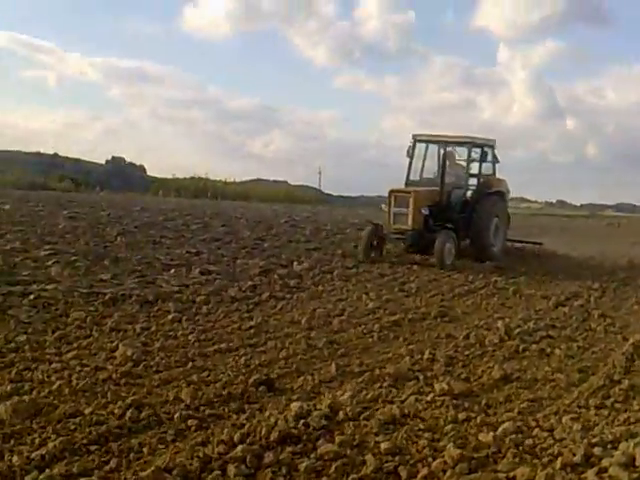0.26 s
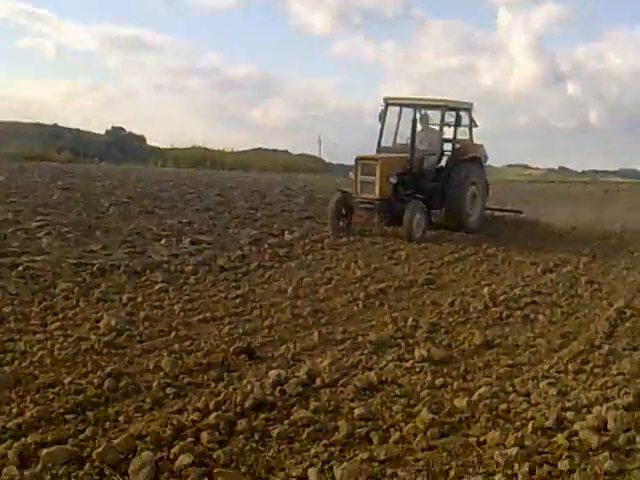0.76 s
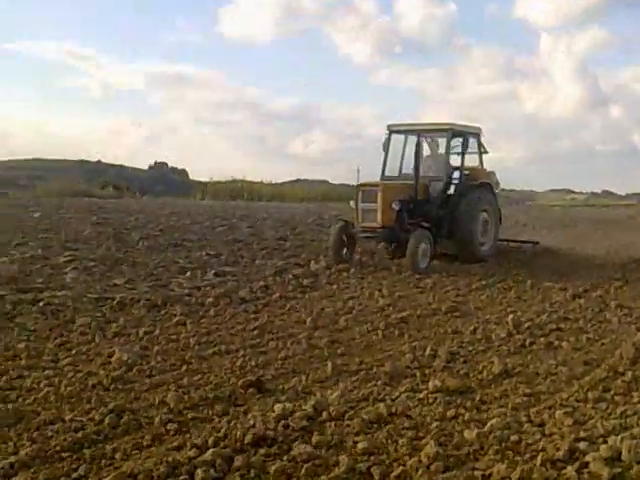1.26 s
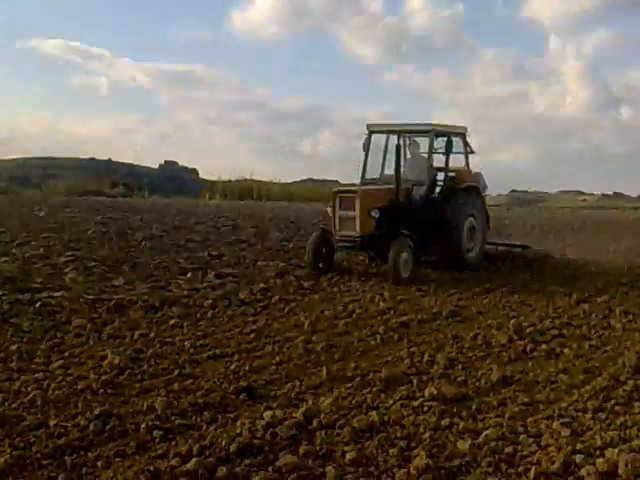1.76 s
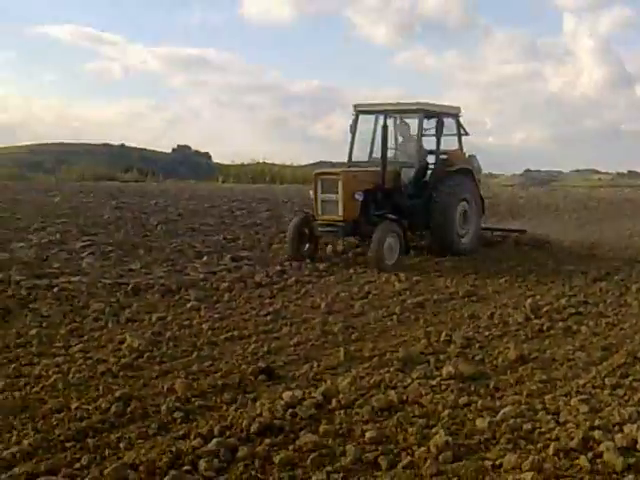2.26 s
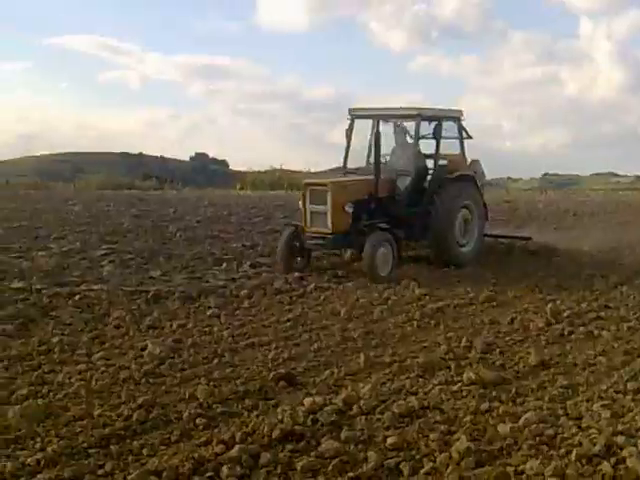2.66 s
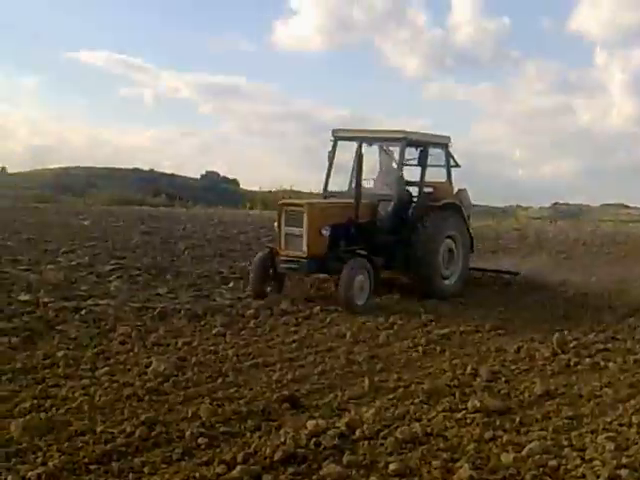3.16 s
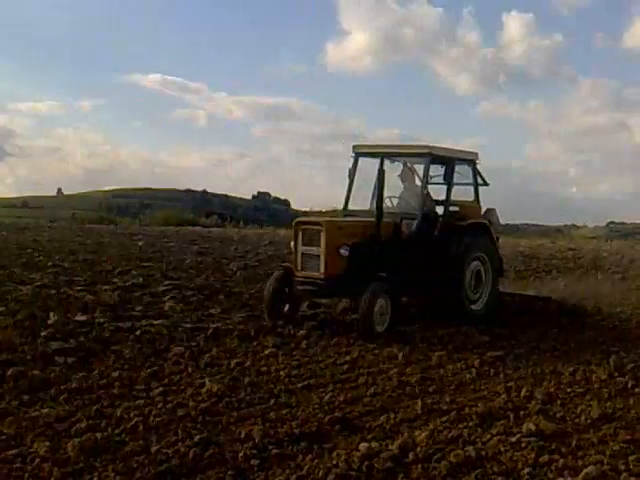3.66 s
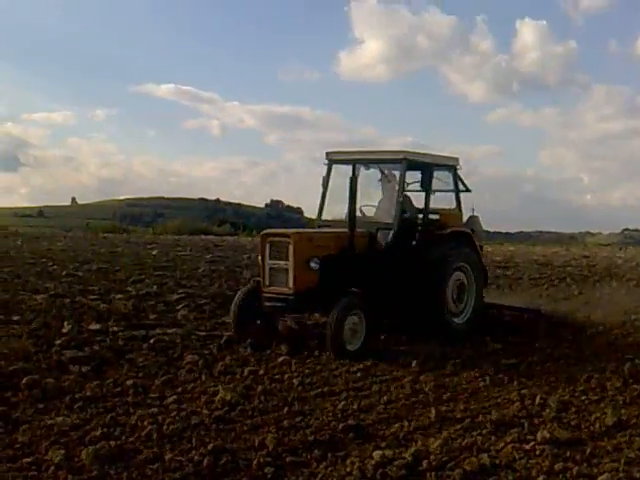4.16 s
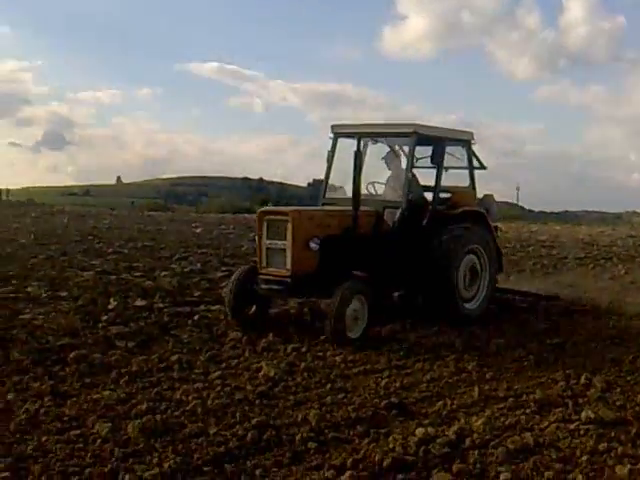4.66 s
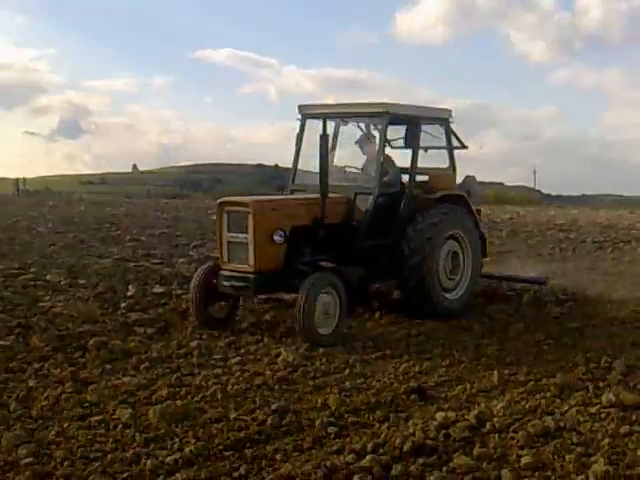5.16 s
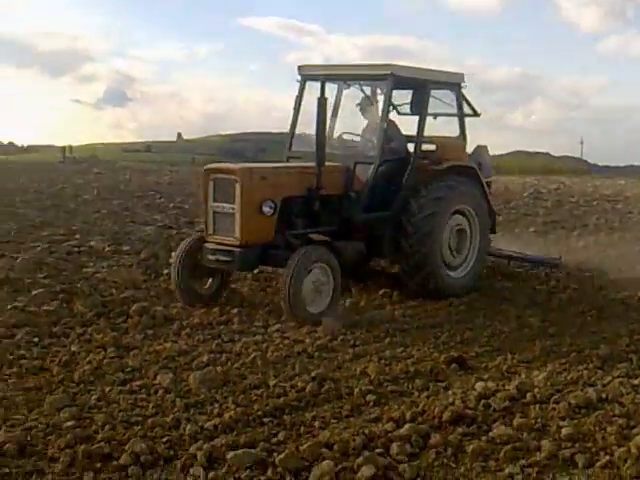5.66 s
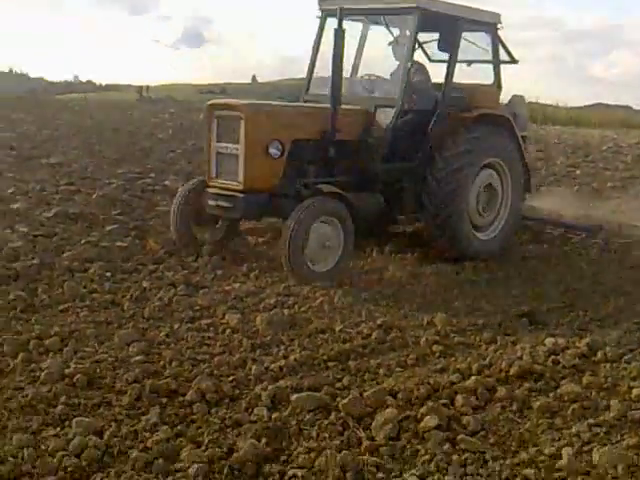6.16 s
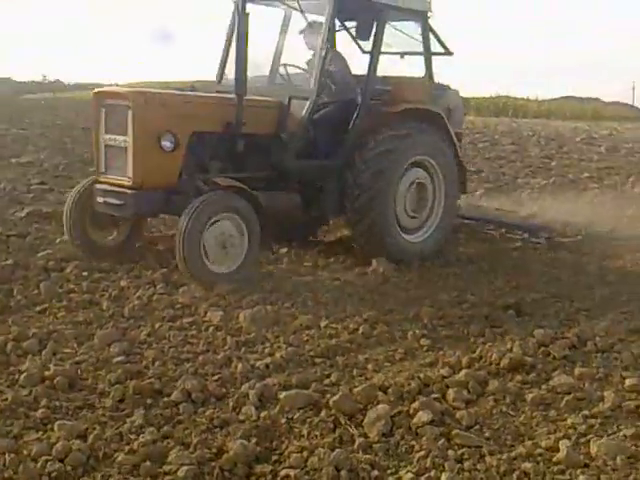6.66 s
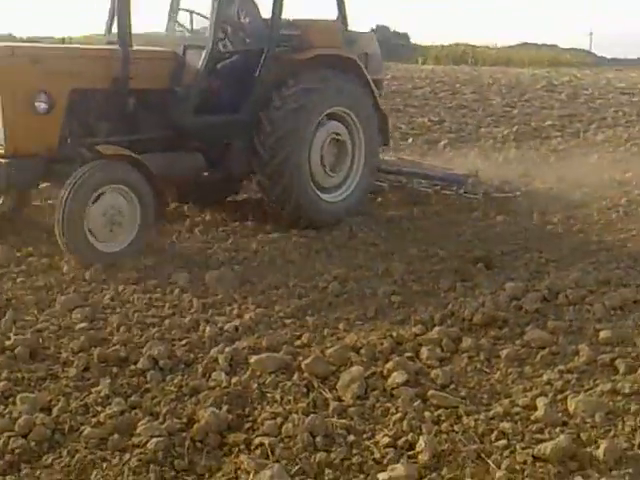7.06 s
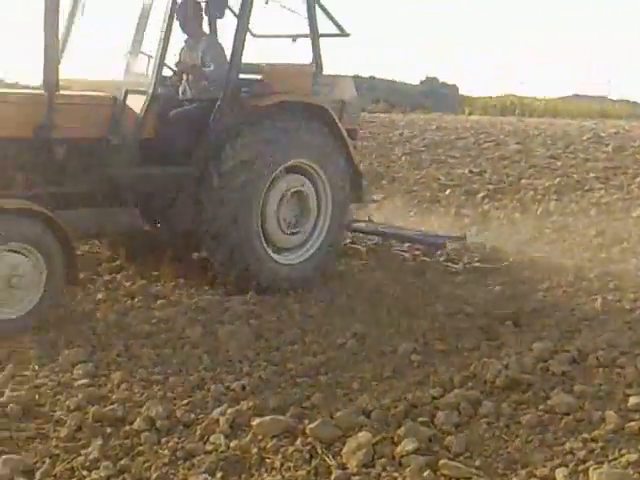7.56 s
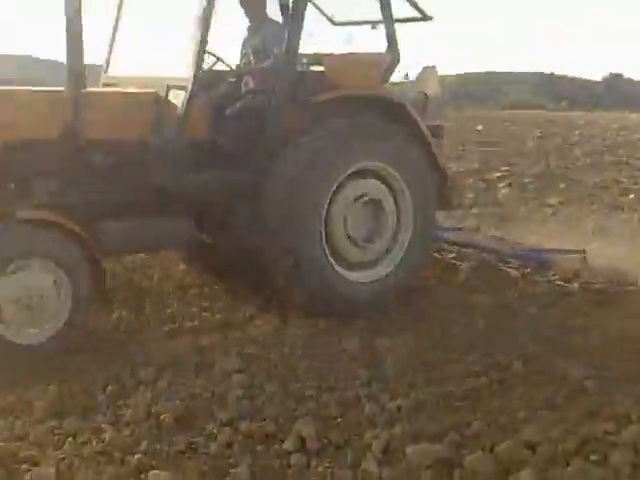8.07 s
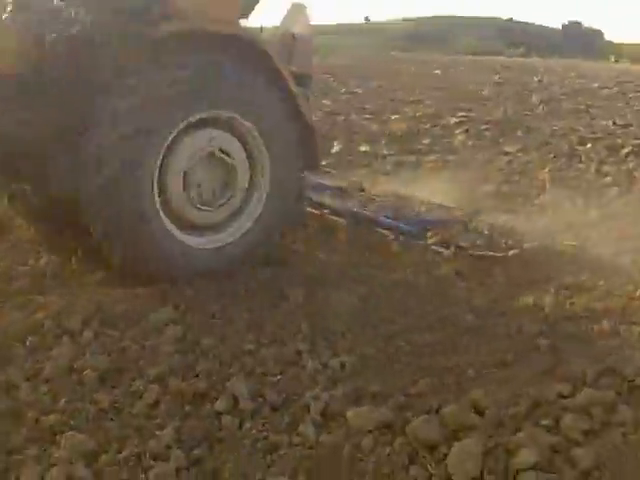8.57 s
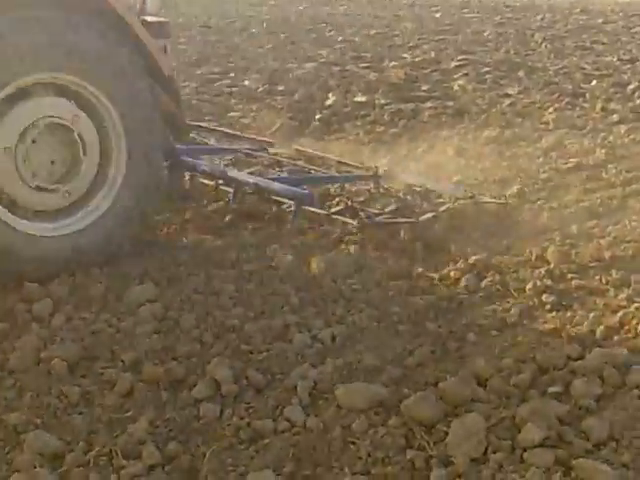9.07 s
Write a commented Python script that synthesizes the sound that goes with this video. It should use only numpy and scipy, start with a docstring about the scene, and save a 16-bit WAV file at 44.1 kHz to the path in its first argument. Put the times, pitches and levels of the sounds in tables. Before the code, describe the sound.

A hard-working tractor engine approaches over dry soil, its rattling diesel drone growing loud and barking sharply before the trailing harrow scrapes past close by.

```python
"""A dry field: a three-cylinder diesel tractor pulls a harrow, comes nearer and draws level with the listener.
Each firing puffs from the exhaust (a sum of harmonics) and knocks on the engine block (bursts of noise
and ringing), harder in each surge of load. Gears whine as wavering tones, and the harrow rattles
through the clods as clumps of small cracks. A lumpy low rumble is wind and, around 7.7 s, the exhaust's
rush. The small microphone has little treble and overloads when the engine barks loudest."""
import sys
import numpy as np
from scipy import signal
from scipy.fft import rfft, irfft
from scipy.io import wavfile
from scipy.ndimage import uniform_filter1d

SR = 44100
rng = np.random.default_rng(int(sys.argv[2]) if len(sys.argv) > 2 else 0)


def pcm_store(signal):
    """Save signal as 16-bit PCM."""
    levels = np.round(np.clip(np.atleast_2d(signal), -1, 1) * 32767)
    wavfile.write(sys.argv[1], SR, levels.astype(np.int16).T)


N = 410130
TIME = np.arange(N) / SR   # seconds

# Engine speed. Each row: time in seconds, firings per second.
ENGINE_SPEED = [(0, 50), (1.45, 50), (1.62, 49.1), (2.27, 50.4), (2.72, 49.5), (2.97, 47.6), (3.38, 47.5),
                (3.77, 49.3), (4.12, 48.6), (5.37, 49.25), (5.6, 48.8), (6.17, 49.75), (6.62, 48.2),
                (6.9, 48.5), (7.15, 47.2), (7.6, 48), (7.92, 49.9), (8.3, 45.7), (8.57, 45), (9.3, 44.65)]
# Surges of load: the governor answers the drag of the harrow, or eases off.
# Each row: start in seconds, length in seconds, load in dB above normal.
LOAD_SURGES = [(-.06, 0.094, 4.5), (.6, 0.3, 2.5), (1.284, 0.16, 3.5), (1.608, 0.61, 2), (2.347, 0.13, -3),
               (2.561, 0.05, 6), (2.76, 0.42, -2), (3.3, 0.47, 3.5), (4.72, 0.3, 0.9), (4.958, 0.059, 4),
               (5.123, 0.26, -1), (5.55, .15, 3.5), (6.634, 0.2, 5), (7.208, 0.21, 4.5), (7.581, 0.23, 9.5),
               (7.94, 0.41, -2.8), (8.503, .52, 4.5), (9.04, 0.36, 5.5)]
SURGE_ATTACK_S, SURGE_RELEASE_S = 0.087, 0.1
# Strength of each cylinder. One column: level in dB.
CYLINDER_DB = [1, 1.5, 1.5]

# The exhaust's two deep harmonics. Each row: multiple of the firing rate, level in dB far off,
# level in dB close by, rise in dB per dB of load.
DEEP_HARMONICS = [(1, -33.5, -34.5, 2.08), (2, -27, -27, 1.0)]
# The exhaust's upper harmonics. Each row: multiple of the firing rate, relative level in dB far off,
# relative level in dB close by.
UPPER_HARMONICS = [(8 / 3, -12.5, -9), (3, 0, 0), (4, -7.5, -9), (5, -15, -2.5), (17 / 3, -28, -9),
                   (6, -36, -10.5), (7, -16, -15), (8, -43, -10.5), (26 / 3, -29, -12), (10, -17, -16)]
# Shared level of the upper harmonics at normal load. Each row: time in seconds, level in dB.
UPPER_LEVEL = [(0, -36), (1.4, -33), (3.1, -37.5), (3.7, -31), (5, -28.5), (6.75, -27.5), (7.15, -32.5),
               (8.2, -33.5), (9.3, -30.5)]
UPPER_PER_LOAD = 1        # dB per dB of load
PUFF_LEAD_TURNS = .19     # a puff leaves the pipe this share of a firing interval before the next knock

# Colour of the engine clatter far off. Each row: frequency in Hz, level in dB per Hz.
BLOCK_FAR = [(60, -16), (130, 15.5), (220, 4), (400, -3.5), (560, 1), (800, -2), (1200, 0.5), (1550, -4.5),
             (2000, -5.5), (3000, -6), (4500, -12), (9000, -6.5), (15000, -21)]
# Colour of the engine clatter close by. Each row: frequency in Hz, level in dB per Hz.
BLOCK_NEAR = [(60, -23), (130, 8), (240, 3.5), (420, -8), (660, 3.5), (850, -3), (1200, 1), (1550, 1.5),
              (2000, 0.5), (3000, 0), (4500, -2), (9000, -4), (15000, -6)]
# Ringing panels, each loudest when it faces the listener. Each row: frequency in Hz, width in Hz,
# level in dB, time it faces the listener in seconds, spread of that time in seconds.
RINGING_PANELS = [(554, 15, 2.5, 1.2, 8.4), (639, 41, 8.5, 7.7, 0.61), (923, 17, 7.5, .7, 1.2),
                  (1343, 53, 2, 1.5, 8.7), (1467, 51, 6.5, 6.42, 0.29), (1747, 59, 3.5, 1.8, 3.3),
                  (1643, 25, 5, 7.6, 1.4), (2205, 74, 4, 1.14, 1.6), (2367, 76, 5, 3.8, 1.5),
                  (2400, 110, 5, 9.8, 1.7), (2750, 46, -0.5, 0.56, 1.6), (2982, 100, 5.5, 7.3, 0.44),
                  (6380, 420, 1, 6.7, 7.9)]
# Spectrum of the injectors' tick. Each row: frequency in Hz, level in dB per Hz.
INJECTOR_TICK = [(1000, -27), (3500, -3), (5000, -14), (8000, 10.5), (11000, 4), (15000, -4)]
CLATTER_DB = -24.5        # mid-band level when level with the listener, at normal load
# Sharpness, the knock above the churn: far off, change close by, rise in dB per dB of load.
SHARPNESS_DB, SHARPNESS_CLOSE_DB, SHARPNESS_PER_LOAD = -6.5, -5.5, 0.63
# Runs of hard knocks, one to a firing, strong and weak in turn.
# Each row: start in seconds, length in seconds, relative peak of the strong knocks in dB.
HARD_KNOCKS = [(5.027, .05, -10), (5.638, .05, -3.5), (6.737, 0.045, -1.5), (7.637, 0.224, 0),
               (8.66, 0.012, -6)]
# Gear pairs, loudest when they face the listener. Each row: multiple of the firing rate, level in dB,
# time they face the listener in seconds, spread of that time in seconds.
GEAR_PAIRS = [(26, -40, 4.0, 3.6), (26, -37.5, 8.08, .13), (30, -43, 6.9, .5), (35, -43, 6.85, .2),
              (35, -40, 8.38, .15)]

# The tractor drives past in a straight line.
PASS_S, PASS_DISTANCE_M, DRIVE_M_PER_S = 8.53, 4.64, 1.49
CLOSE_SOUND_POWER = 5.5   # how quickly the close colour takes over as the distance shrinks
# The harrow trails: its mid-band level when it draws level, at normal load, and its place.
HARROW_DB, HARROW_BEHIND_M, HARROW_DISTANCE_M = -25, 1.45, 1.26
HARROW_PER_LOAD = 0.49    # dB per dB of load: the tines tear harder when they drag
# Colour of crumbling soil. Each row: frequency in Hz, level in dB per Hz.
SOIL_COLOUR = [(150, -31), (600, -1), (1500, 1.5), (2500, 3.5), (5000, 4.5), (10000, -13), (15000, -17)]

# Colour of the low rumble. Each row: frequency in Hz, level in dB per Hz.
RUMBLE_COLOUR = [(15, -17), (28, -5.5), (45, -1), (66, 0.5), (120, -6.5), (200, -13), (350, -18),
                 (600, -24.5), (2000, -41)]
# Level of the low rumble: a fading breeze, and the exhaust's rush around 7.7 s.
# Each row: time in seconds, relative level in dB.
RUMBLE_LEVEL = [(0, -29.5), (2.5, -28.5), (3.1, -36), (3.9, -29), (5.4, -36.5), (6.3, -34), (7.7, -29),
                (8.5, -36), (9.3, -44)]
# Gusts. Each row: middle in seconds, length in seconds, relative peak in dB.
WIND_GUSTS = [(0.027, 0.14, -26), (1.407, .1, -25.5), (1.668, 0.056, -23), (1.9, 0.076, -18.5),
              (2.125, 0.047, -16.5), (2.25, .12, -20.5), (2.686, .13, -21), (2.835, .06, -26),
              (3.111, .04, -22.5), (4.0, .07, -31), (4.45, 0.052, -26), (4.866, .22, -25),
              (8.17, .1, -26.5)]
# The microphone's response. Each row: frequency in Hz, gain in dB.
MICROPHONE_RESPONSE = [(20, 1), (2950, 0.5), (3300, -6.5), (3750, -11), (4300, -23), (5500, -22.5),
                       (8000, -26.5), (10500, -26.5), (12500, -31.5), (15500, -29)]
HISS_DB, CUTOFF_HZ = -65.5, 15750


def crank():
    """Firings counted over time; the crank is in step with the start of each run of hard knocks."""
    turns = np.cumsum(in_time(ENGINE_SPEED)[0]) / SR
    when = np.array(HARD_KNOCKS)[:, 0]
    # Shift the count so that it is a whole number at each run's start.
    phase = np.unwrap(np.interp(when, TIME, turns) % 1, period=1)
    return turns - np.interp(TIME, when, phase)


def engine_load():
    """Load in dB above normal: each surge builds, holds and lets go."""
    load = np.zeros(N)
    for start, length, db in LOAD_SURGES:
        build = (TIME - start) / SURGE_ATTACK_S
        let_go = 1 - (TIME - start - length) / SURGE_RELEASE_S
        load += db * np.clip(np.minimum(build, let_go), 0, 1)
    return load


def exhaust(turns, near, load, waver_db=2.0, lope=0.037, full_load_db=15.0):
    """Puff harmonics swell with load, up to full fuel; unequal cylinders make them lope each engine cycle."""
    push = full_load_db * np.tanh(load / full_load_db)
    upper_db = in_time(UPPER_LEVEL)[0] + UPPER_PER_LOAD * push
    deep = [(k, far_db, near_db, per_load * push, -1 / 4)
            for k, far_db, near_db, per_load in DEEP_HARMONICS]
    # The pipe scatters the upper harmonics in time, so each starts at a random phase.
    upper = [(k, far_db, near_db, upper_db, rng.random()) for k, far_db, near_db in UPPER_HARMONICS]
    out = np.zeros(N)
    for k, far_db, near_db, swell_db, lag in deep + upper:
        level_db = swell_db + far_db + near * (near_db - far_db) + waver_db * drift(3.5)
        multiple = np.round(3 * k) / 3   # whole thirds repeat once per engine cycle
        phase = multiple * (turns + PUFF_LEAD_TURNS) + lag
        out += np.sqrt(2) * from_db(level_db) * np.cos(2 * np.pi * phase)
    return out * (1 + lope * np.cos(2 * np.pi * turns / len(CYLINDER_DB)))


def engine(turns, near, load, unsteady_db=0.93, slap_lag=0.21, edge_hz=4300, edge=0.41):
    """The harder the knock, the more it stands out of the churn and the brighter its edge."""
    load = load + unsteady_db * drift(1.67)
    sharpness_db = SHARPNESS_DB + SHARPNESS_CLOSE_DB * near + SHARPNESS_PER_LOAD * load
    slaps = firings(turns - slap_lag, scatter_db=10.0)
    clatter = block(firings(turns, scatter_db=0.84), slaps, near, from_db(sharpness_db))
    top = signal.sosfiltfilt(signal.butter(4, edge_hz, "high", fs=SR, output="sos"), clatter)
    bright = from_db(edge * sharpness_db) * (top + injectors(turns))
    return from_db(CLATTER_DB + load) * (clatter - top + bright)


def firings(turns, scatter_db):
    """One click per firing, a row for each of the three cylinders."""
    at = np.flatnonzero(np.diff(np.floor(turns)) > 0)
    cylinder = np.arange(len(at)) % len(CYLINDER_DB)
    strength_db = np.array(CYLINDER_DB)[cylinder] + scatter_db * rng.standard_normal(len(at))
    clicks = np.zeros((len(CYLINDER_DB), N))
    clicks[cylinder, at] = from_db(strength_db)
    return clicks


def block(clicks, slaps, near, hardness, knock_s=0.0017, rise_s=0.0012, slap=0.11, ring_s=0.017,
          ring_db=-2.0, lowest_ring_hz=400, mechanism_db=-1.0, size=3400):
    """Combustion knocks, partly alike on every cycle, and piston slaps over the churn of valves and fan."""
    age = np.arange(size) / SR
    fade = np.exp(-age / ring_s) * (1 - np.exp(-age / rise_s))
    # Each cylinder rings the stiff block in a way of its own.
    rings = [signal.oaconvolve(row, rng.standard_normal(size) * fade)[:N] for row in clicks]
    ring = rms_one(sum(rings))
    ring = signal.sosfilt(signal.butter(2, lowest_ring_hz, "high", fs=SR, output="sos"), ring)

    blows = (clicks + slap * slaps).sum(axis=0)
    burst = rms_one(die_away(die_away(blows, knock_s), rise_s))
    force = np.hypot(hardness * burst, from_db(mechanism_db))   # knocks and steady churn together
    drive = force * rng.standard_normal(N) + from_db(ring_db) * ring
    out = (1 - near) * colour(drive, BLOCK_FAR) + near * colour(drive, BLOCK_NEAR)
    for hz, width, db, when, spread in RINGING_PANELS:
        panel = resonate(force * rng.standard_normal(N), hz, width)
        out += from_db(db) * facing(when, spread) * panel
    return steady(out)


def injectors(turns, width_s=0.0015, level_db=-3.0, size=301):
    """A short bright spit of noise that swells and fades at every firing."""
    clicks = np.minimum(firings(turns, scatter_db=4).sum(axis=0), 2)
    swell = signal.oaconvolve(clicks, signal.windows.gaussian(size, width_s * SR), "same")
    return from_db(level_db) * rms_one(colour(swell * rng.standard_normal(N), INJECTOR_TICK))


def knocks(decay_s=0.00089, level_db=0.5, first_softer_db=5.0, weak_softer_db=11.0, scatter_db=0.5):
    """The cracks of hard firings, through the engine block; a run starts softly."""
    clicks, speed = np.zeros(N), in_time(ENGINE_SPEED)[0]
    for start, length, db in HARD_KNOCKS:
        interval = 1 / speed[round((start + length / 2) * SR)]
        times = np.arange(start, start + length, interval)
        count = np.arange(len(times))
        softer_db = first_softer_db * (count == 0) + weak_softer_db * (count % 2)
        knock_db = db + level_db - softer_db + scatter_db * rng.standard_normal(len(times))
        clicks[np.round(times * SR).astype(int)] = from_db(knock_db)
    # Scaled so that each crack's envelope peaks at its click's size.
    crack = die_away(die_away(clicks, decay_s), decay_s) * np.e / (decay_s * SR)
    return colour(crack * rng.standard_normal(N), BLOCK_NEAR)


def gears(turns, wobble=0.63, flutter_db=2.5):
    """Meshing teeth sing at multiples of the firing rate; pitch and level waver (wobble in radians)."""
    out = np.zeros(N)
    for multiple, db, when, spread in GEAR_PAIRS:
        gain = facing(when, spread) * from_db(db + flutter_db * drift(6.0))
        phase = 2 * np.pi * np.round(multiple) * turns + wobble * drift(12.5)
        out += np.sqrt(2) * gain * np.sin(phase)
    return out


def harrow(level_db, per_s=900, size_spread_db=2.5, clump_db=2.5):
    """Tines break clods: clumps of small cracks of very unequal size."""
    born = rng.random(N) < per_s * from_db(clump_db * drift(10)) / SR
    sizes = from_db(size_spread_db * np.minimum(rng.exponential(1, N), 4))
    cracks = die_away(born * sizes, seconds=0.0015) * rng.standard_normal(N)
    return from_db(level_db) * steady(colour(cracks, SOIL_COLOUR))


def facing(when, spread):
    """Gain of a tractor part that turns towards the listener and away again."""
    return np.exp(-.5 * ((TIME - when) / spread) ** 2)


def closeness(nearest_m, behind_m=0):
    """Gain of a passing source: 1 when level with the listener, falling with distance."""
    along_m = DRIVE_M_PER_S * (TIME - PASS_S) - behind_m
    return nearest_m / np.hypot(nearest_m, along_m)


def low_rumble(level_db=4.5, lumps_db=2.5, lumps_per_s=7.8, size=3000):
    """Turbulent air, from the wind and the exhaust's rush: a lumpy rumble that swells with each gust."""
    rumble = colour(rng.standard_normal(N), RUMBLE_COLOUR)
    even_rumble = rumble / np.sqrt(uniform_filter1d(rumble ** 2, size))
    lumpy = from_db(in_time(RUMBLE_LEVEL)[0] + lumps_db * drift(lumps_per_s))
    gusts = sum(from_db(db) * np.exp(-2 * ((TIME - s) / length) ** 2) for s, length, db in WIND_GUSTS)
    return from_db(level_db) * np.hypot(lumpy, gusts) * even_rumble


def from_db(db):
    """Turns decibels into a plain gain."""
    return 10 ** (np.asarray(db) / 20)


def rms_one(x):
    """Scales a sound to an overall rms of 1."""
    return x / np.sqrt(np.mean(x ** 2) + 1e-20)


def in_time(rows):
    """Each column of a curve after the first (time in seconds), at every sample."""
    seconds, *columns = np.transpose(rows)
    return [np.interp(TIME, seconds, column) for column in columns]


def drift(rate):
    """Slow random wandering of rms 1: noise through two equal low-passes at the rate in Hz."""
    step = 40   # samples between the slow values
    r = np.exp(-2 * np.pi * step * rate / SR)
    noise = rng.standard_normal(N // step + 2002)
    slow = signal.lfilter([1], [1, -2 * r, r * r], noise)[2000:]   # drop the filter's start-up
    return np.interp(np.arange(N) / step, np.arange(len(slow)), rms_one(slow))


def colour(x, spectrum, size=8192):
    """Causal (minimum-phase) filter with the given spectrum."""
    hz, db = np.transpose(spectrum)
    grid = np.maximum(np.arange(size // 2 + 1) * SR / size, 1)
    gain = from_db(np.interp(np.log(grid), np.log(hz), db))
    # Folding the cepstrum forward in time keeps the response from starting early.
    cepstrum = irfft(np.log(gain))
    cepstrum[1:size // 2] *= 2
    cepstrum[size // 2 + 1:] = 0
    return signal.oaconvolve(x, irfft(np.exp(rfft(cepstrum))))[:N]


def resonate(x, hz, width):
    """One resonance, its width in Hz, with gain about 1 on top."""
    r = np.exp(-np.pi * width / SR)
    feedback = [1, -2 * r * np.cos(2 * np.pi * hz / SR), r * r]
    return signal.lfilter(np.array([1, 0, -1]) * (1 - r * r) / 2, feedback, x)


def die_away(clicks, seconds):
    """Each click jumps up and decays."""
    return signal.lfilter([1], [1, -np.exp(-1 / (seconds * SR))], clicks + 1e-18)


def steady(x, size=8001):
    """Holds the mid band of a sound near rms 1, over a sliding window of size samples."""
    mid = signal.sosfilt(signal.butter(3, [800, 3500], "band", fs=SR, output="sos"), x)
    return x / np.sqrt(uniform_filter1d(mid ** 2, size) + 1e-12)


def scene():
    """The tractor and its harrow draw near in a gusty wind."""
    turns, load, gain = crank(), engine_load(), closeness(PASS_DISTANCE_M)
    near = gain ** CLOSE_SOUND_POWER   # share of the close-by colour
    tractor = exhaust(turns, near, load) + gain * engine(turns, near, load) + gears(turns) + knocks()
    harrow_gain = closeness(HARROW_DISTANCE_M, HARROW_BEHIND_M)
    soil = harrow_gain * harrow(HARROW_DB + HARROW_PER_LOAD * load)
    return (tractor + soil + low_rumble())[None]


def record(dry):
    """The microphone drops the treble and hisses faintly, the loudest peaks clip, the top is cut."""
    x = colour(dry[0], MICROPHONE_RESPONSE) + from_db(HISS_DB) * rng.standard_normal(N)
    x = np.clip(x, -.7, .7)
    return signal.sosfilt(signal.ellip(10, .2, 80, CUTOFF_HZ, fs=SR, output="sos"), x)[None]


dry = scene()
out = record(dry)
pcm_store(out)
```